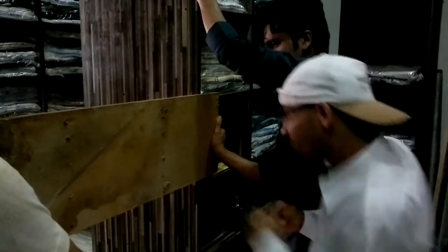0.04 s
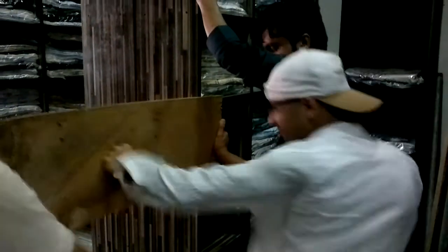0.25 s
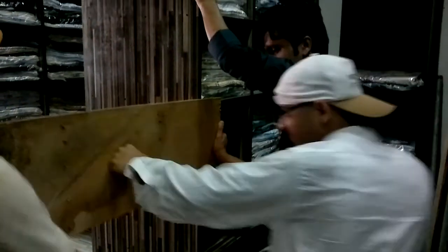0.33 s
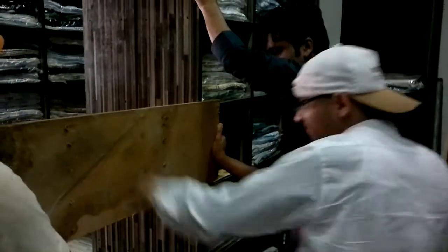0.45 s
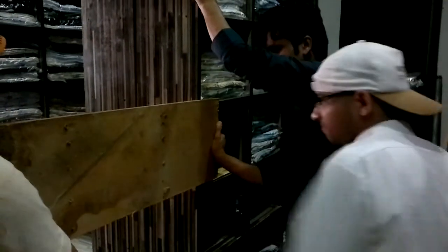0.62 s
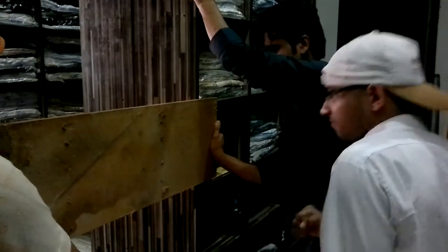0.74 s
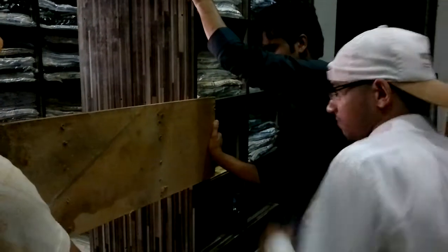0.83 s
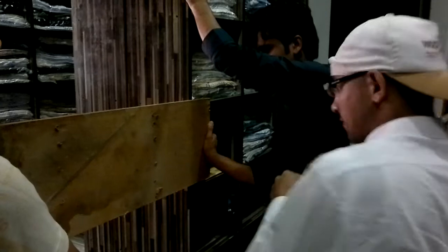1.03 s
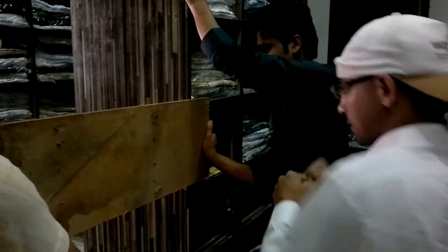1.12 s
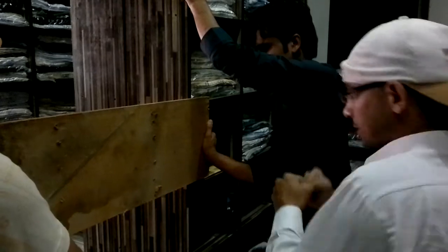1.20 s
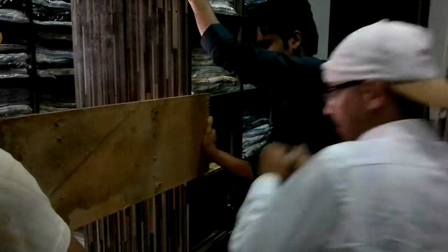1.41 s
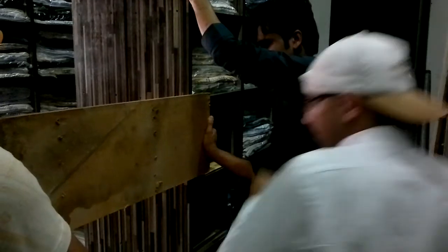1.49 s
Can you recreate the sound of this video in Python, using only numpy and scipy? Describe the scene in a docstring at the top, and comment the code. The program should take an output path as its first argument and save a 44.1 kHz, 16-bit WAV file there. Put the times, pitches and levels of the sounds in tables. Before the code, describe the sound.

One loud whack of a punch on a hand-held wooden board, heard from nearby in a small shop. The wood rings and dies away quickly, then sleeves swish softly and the board shifts faintly above a quiet hum.

```python
"""A sharp boom and clatter: a fist punches a thin wooden board held up by hand in a small, cluttered shop.
The board cracks, rings and slaps against its support, and the room answers briefly.
Shirt cloth swishes as the arm swings back, and the board scuffs and wobbles faintly in the hands.
A low hum lies underneath."""
import sys
import numpy as np
from scipy import signal
from scipy.fft import rfft, irfft
from scipy.io import wavfile
from scipy.ndimage import uniform_filter1d

SR = 44100
rng = np.random.default_rng(int(sys.argv[2]) if len(sys.argv) > 2 else 0)


def generate_wav(sig):
    """Save sig (samples, or channels by samples) to the path in sys.argv[1] as 16-bit PCM at SR."""
    pcm = np.round(np.clip(np.atleast_2d(sig).T, -1, 1) * 32767).astype(np.int16)
    wavfile.write(sys.argv[1], SR, pcm)


N = 68355
SNAP_RISE_S = 0.00069  # how fast cracks and handling ticks start

# The fist's hit, then the board slapping its support:
# t/s, push level/dB, ring level/dB, crack level/dB, contact time/s
HITS = [(0.21642, -12.5, -7, -14.5, .00058), (0.22318, -18.5, -14, -22.5, .0008),
        (0.22975, -5.5, -10, -25, .00015), (0.23115, -4, -17.5, -21, .00037),
        (0.23464, -5.5, -19, -27, .00026), (0.23756, -12, -15, -25.5, 0.00081),
        (0.25047, -14.5, -18, -29.5, .00015)]
# The notes the board rings at: f/Hz, level/dB, fade/s (a fade is the time to drop by 60 dB)
BOARD_NOTES = [(79.5, -6.5, 0.14), (105.7, -8.5, 0.11), (193.3, -21.5, .25), (265.2, -8.5, 0.12),
               (322, -15, 0.12), (377.1, -14.5, 0.068), (491.6, -14.5, 0.32), (599.4, -12, 0.07),
               (739, -15, .15), (910, -6.5, 0.036), (1045, -10.5, 0.1), (1271, -22, 0.2),
               (1845, -11, 0.093), (2023, -19.5, .14), (2216, -7.5, .16), (2403, -14, 0.062),
               (2960, -23.5, 0.12), (3392, -9, 0.02)]
# The crack's colour, meaning how strong its low and high parts are: f/Hz, level/dB
CRACK_COLOUR = [(200, -14), (1300, -3.5), (2200, 14), (3100, -3), (4000, -14.5), (5200, -3.5),
                (6400, -12.5), (8000, 9), (10000, -4), (12000, -28), (16000, -46)]
def board():
    """Each hit shoves the air, makes the wood ring and gives a short crack."""
    age = since(0)
    ring = sum(amp(db - 60 * age / fade) * np.cos(2 * np.pi * hz * age) for hz, db, fade in BOARD_NOTES)
    strike_s, rebound_delay_s, rebound_width_s = 0.0001, 0.00192, 0.00028
    out, force = np.zeros(N), np.zeros(N)
    for start, push_db, ring_db, crack_db, contact_s in HITS:
        t = since(start)
        strike = np.exp(-(t / strike_s) ** 2)  # short and hard, so high notes ring too
        force += amp(ring_db) * strike / strike.sum()
        push = np.exp(-(t / contact_s) ** 2)
        spring_back = 1.1 * np.exp(-((t - rebound_delay_s) / rebound_width_s) ** 2)
        out += amp(push_db) * (push - spring_back)
        crack = envelope(start - SNAP_RISE_S, SNAP_RISE_S, hold=0.0018, fade=0.012)
        out += amp(crack_db) * crack * noise(CRACK_COLOUR)
    return out + signal.fftconvolve(force, ring)[:N]


# The colour of board and room ringing together: f/Hz, level/dB
ECHO_COLOUR = [(40, -18.5), (75, -10.5), (130, -26.5), (200, -15), (290, -7.5), (500, -14.5), (750, -13),
               (1000, -9.5), (1550, -16.5), (2250, -16.5), (2800, -16.5), (3600, -18), (4100, -24.5),
               (5200, -23), (6400, -24), (8000, -17.5), (10000, -25.5), (12000, -35.5), (15000, -59)]
# How long each range of pitch rings on: f/Hz, fade/s
ECHO_FADES = [(60, .45), (250, .22), (900, 0.16), (2300, 0.13), (5000, 0.13), (9000, .18)]
def room_echo():
    """Reflections build up during the clatter and die away range by range, over a faint longer echo."""
    hz = np.fft.rfftfreq(N, 1 / SR)
    swell = (0.21024, 0.019, 0.017)  # start/s, rise/s, hold/s
    lift_db, width_hz = 3.5, 71  # the echo is stronger near the board's notes
    nearness = np.max([1 / (1 + ((hz - note[0]) / width_hz) ** 2) for note in BOARD_NOTES], axis=0)
    wash = unit(irfft(rfft(noise(ECHO_COLOUR)) * amp(lift_db * nearness), N))
    out = amp(-36.5) * envelope(*swell, fade=0.58) * noise(ECHO_COLOUR)  # the longer echo
    for centre, fade in ECHO_FADES:
        band = read([(f, float(f == centre)) for f, _ in ECHO_FADES], hz)
        out += amp(-16) * envelope(*swell, fade) * irfft(rfft(wash) * band, N)
    return out


# Swishes of the shirt: t/s, rise/s, hold/s, fade/s, soft level/dB, rasp level/dB, fizz level/dB
SHIRT_SWISHES = [(0.118, 0.08, .02, 0.15, -63, -85, -68.5), (0.314, 0.026, 0.022, 0.27, -61, -52.5, -44),
                 (0.37, 0.049, 0.06, 0.18, -59, -51, -52), (0.519, 0.05, 0.027, 0.18, -55.5, -92, -61.5),
                 (0.624, 0.093, .03, 0.21, -72, -81, -68.5), (0.707, 0.048, 0.005, 0.12, -64, -50, -56),
                 (0.747, 0.063, .022, 0.16, -78, -42.5, -46),
                 (0.846, 0.029, 0.015, 0.18, -51.5, -45.5, -51.5),
                 (0.932, .025, .01, 0.36, -57.5, -77, -64.5), (1.008, 0.054, 0.047, 0.52, -60, -57, -51.5),
                 (1.158, 0.011, 0.015, 0.18, -56, -76, -39.5),
                 (1.152, 0.058, 0.022, 0.19, -53.5, -52, -53.5),
                 (1.248, 0.018, 0.014, 0.084, -55, -63, -53.5), (1.289, 0.034, 0.053, .08, -72, -70.5, -60),
                 (1.512, 0.047, .02, .1, -87, -70, -41.5)]
# The cloth's three colours, from dull to bright: f/Hz, level/dB
SOFT_COLOUR = [(300, -30), (1100, -24.5), (1600, -10), (2000, 1.5), (2700, -4), (3600, -10), (6000, -34.5),
               (16000, -56)]
RASP_COLOUR = [(1000, -44.5), (2400, 1.5), (3500, 3), (5000, 0.5), (7000, -2), (11000, -11), (14500, -19),
               (16000, -18)]
FIZZ_COLOUR = [(2000, -40.5), (3800, -32), (5100, -13), (6200, -17.5), (7600, -2), (9400, 2), (10500, -5.5),
               (12000, -11), (14000, -18.5), (16000, -45)]
def shirt():
    """Cloth rubs as the arm moves; each swish is its own blend of three noises."""
    colours = np.array([noise(SOFT_COLOUR), noise(RASP_COLOUR), noise(FIZZ_COLOUR)])
    swishes = sum(envelope(*row[:4]) * (amp(row[4:]) @ colours) for row in SHIRT_SWISHES)
    grain = unit(amp(drift(0.0017)))  # the level flickers by about 1 dB
    return swishes * grain


# Puffs of air: t/s, rise/s, hold/s, fade/s, f/Hz, level/dB
AIR_PUFFS = [(0.745, .06, .012, .16, 68, -36), (0.355, .025, .015, .1, 76, -44)]
# The rumble inside each puff: f/Hz, level/dB
RUMBLE_COLOUR = [(30, 2.5), (90, 8.5), (130, -2.5), (220, -21.5), (500, -27), (900, -38), (4000, -78)]
def air_puffs():
    """The moving body pushes air, heard as a low note with a rumble."""
    rumble = amp(-6) * noise(RUMBLE_COLOUR)
    return sum(amp(db) * envelope(*shape) * (tone(hz, shape[0]) + rumble) for *shape, hz, db in AIR_PUFFS)


# Wobbles of the board: t/s, f/Hz, level/dB
BOARD_WOBBLES = [(0.37, 237, -47), (0.373, 301, -46.5), (0.499, 256, -57), (1.256, 247, -62.5)]
def wobbles():
    """The held board wobbles, giving faint, short notes."""
    return sum(amp(db) * envelope(start, rise=0.0053, hold=0, fade=0.18) * tone(hz, start)
               for start, hz, db in BOARD_WOBBLES)


# Small ticks: t/s, level/dB, fade/s
HANDLING_TICKS = [(0.3514, -47, 0.034), (1.044, -56.5, 0.026), (1.4502, -52.5, 0.19)]
# Their colour: f/Hz, level/dB
HANDLING_TICK_COLOUR = [(300, -4.5), (1200, -23), (1550, -8), (1900, -4), (2500, -16), (3200, -42),
                        (9000, -18), (12000, -35.5)]
def ticks():
    """Handling the board makes small ticks that start fast and fade."""
    loudness = sum(amp(db) * envelope(start, SNAP_RISE_S, 0, fade) for start, db, fade in HANDLING_TICKS)
    return loudness * noise(HANDLING_TICK_COLOUR)


# Soft scuffs: t/s, rise/s, hold/s, fade/s, level/dB
HAND_SCUFFS = [(0.492, .02, 0.025, 0.14, -60), (0.56, 0.019, 0.026, 0.14, -61),
               (1.038, 0.034, 0.016, 0.38, -61)]
# Their dull colour: f/Hz, level/dB
SCUFF_COLOUR = [(100, -6), (280, 4.5), (500, 5.5), (1150, 7.5), (1700, 3.5), (5000, -29)]
def scuffs():
    """The board shifts in the hands with a dull brushing noise."""
    return noise(SCUFF_COLOUR) * sum(amp(db) * envelope(*shape) for *shape, db in HAND_SCUFFS)


# Thin scrapes: t/s, rise/s, hold/s, fade/s, f/Hz, level/dB
THIN_SCRAPES = [(0.547, 0.033, 0.055, 0.099, 2050, -59), (1.099, .03, 0.018, 0.1, 2450, -59.5),
                (1.313, 0.026, 0.021, .12, 2100, -69)]
def scrapes():
    """Rubbing makes noise that gathers closely round one pitch."""
    hz = np.fft.rfftfreq(N, 1 / SR)
    width_hz = 170
    out = np.zeros(N)
    for *shape, centre, db in THIN_SCRAPES:
        rub = irfft(rfft(rng.standard_normal(N)) / (1 + ((hz - centre) / width_hz) ** 2), N)
        out += amp(db) * envelope(*shape) * unit(rub)
    return out


# One faint tick: t/s, rise/s, hold/s, fade/s, level/dB before fading
FAINT_TICK = (0.04, 0.0027, -0.0083, 0.0082, -12.5)
# Its bright colour: f/Hz, level/dB
FAINT_TICK_COLOUR = [(500, -21), (2300, -2), (3800, -16), (5200, 0.5), (6400, -14.5), (8200, 4),
                     (10200, -0.5), (11800, -20), (15000, -40.5)]
def faint_tick():
    """A barely audible bright tick well before the punch; its negative hold fades it early."""
    *shape, db = FAINT_TICK
    return amp(db) * envelope(*shape) * noise(FAINT_TICK_COLOUR)


# The shop's steady background noise: f/Hz, level/dB
ROOM_COLOUR = [(20, -9.5), (35, 5), (60, 0), (100, -10), (200, -22.5), (400, -27.5), (700, -37.5),
               (1400, -37.5), (2100, -26), (2700, -28.5), (3200, -41.5), (6000, -42), (9000, -39),
               (11000, -47), (12500, -60), (16000, -69.5)]
def room_tone():
    """A low hum wavers in pitch and loudness over quiet, steady noise."""
    hum_hz, waver = 59.2, 0.3
    phase = 2 * np.pi * hum_hz * since(0) + waver * drift(0.033)
    hum = np.sqrt(2) * np.sin(phase) * (1 + waver * drift(0.1))
    return amp(-51.5) * hum + amp(-55) * noise(ROOM_COLOUR)


def amp(db):
    """Turns decibels into a number to multiply by."""
    return 10 ** (np.asarray(db) / 20)


def unit(x):
    """Scales a signal to an average strength (rms) of 1."""
    return x / np.sqrt(np.mean(x ** 2) + 1e-20)


def read(points, hz):
    """Reads between a table's rows, giving each octave equal room."""
    f, value = np.transpose(points)
    return np.interp(np.log(hz + 1), np.log(f + 1), value)


def since(start):
    """Seconds since start, negative before it."""
    return np.arange(N) / SR - start


def tone(hz, start):
    """A pure note whose wave rises through zero at start."""
    return np.sin(2 * np.pi * hz * since(start))


def noise(colour):
    """Noise of strength 1 with the given colour."""
    hz = np.fft.rfftfreq(N, 1 / SR)
    return unit(irfft(rfft(rng.standard_normal(N)) * amp(read(colour, hz)), N))


def drift(seconds):
    """A random curve of strength 1, smoothed over the given time."""
    return unit(uniform_filter1d(rng.standard_normal(N), max(int(seconds * SR), 1)))


def envelope(start, rise, hold, fade):
    """Loudness over time: a smooth rise, a hold, then a drop of 60 dB every `fade` seconds."""
    t = since(start)
    swell = np.sin(np.pi / 2 * np.clip(t / rise, 0, 1)) ** 2
    return swell * 1000 ** (-np.maximum(t - rise - hold, 0) / fade)


def scene():
    """The punch, the movements around it and the room, in one channel."""
    early_tick = faint_tick()
    punch = board() + room_echo()
    movement = shirt() + scuffs() + air_puffs() + ticks() + wobbles() + scrapes()
    return (punch + movement + early_tick + room_tone())[None]


def record(dry):
    """Flattens the loudest peaks, then removes the very highest treble."""
    ceiling, cutoff_hz = 0.97, 15800
    lowpass = signal.firwin(511, cutoff_hz, window=("kaiser", 9), fs=SR)
    return signal.oaconvolve(np.clip(dry, -ceiling, ceiling), lowpass[None], "same")


dry = scene()
out = record(dry)
generate_wav(out)
```